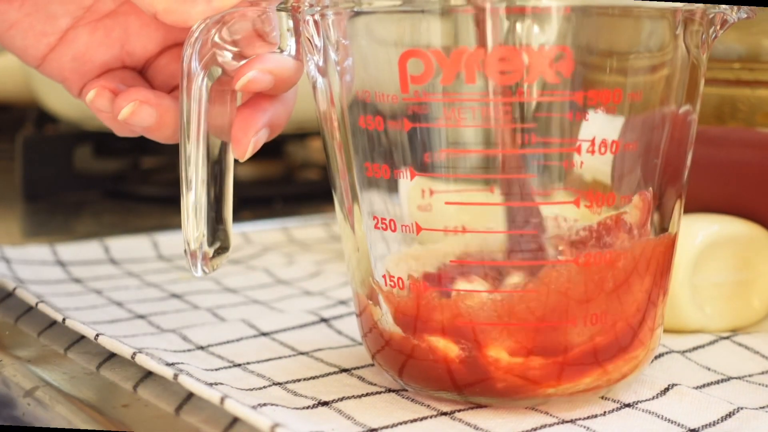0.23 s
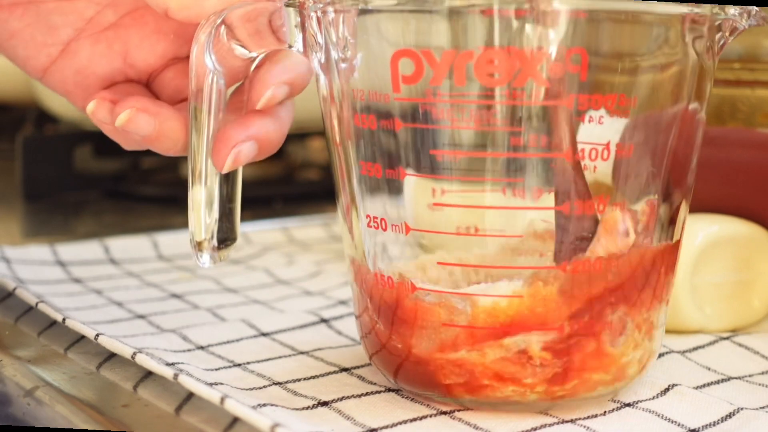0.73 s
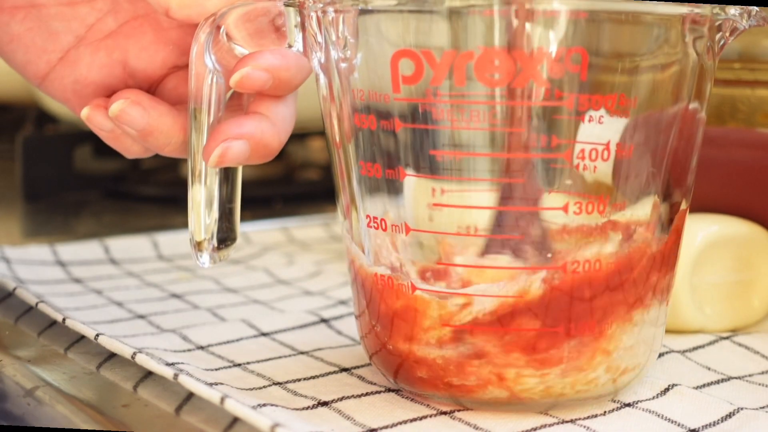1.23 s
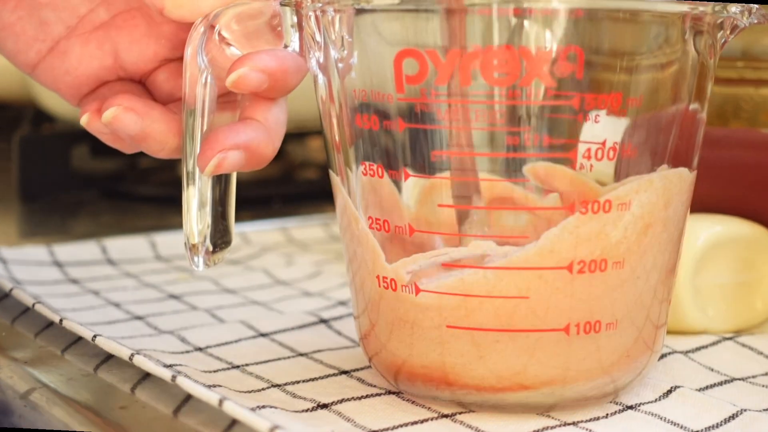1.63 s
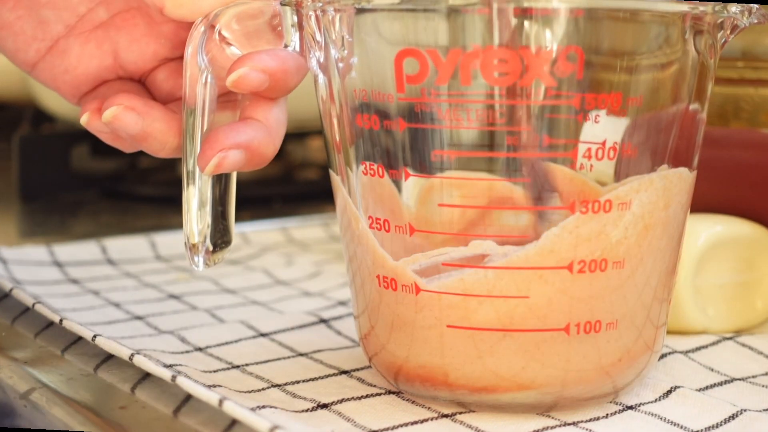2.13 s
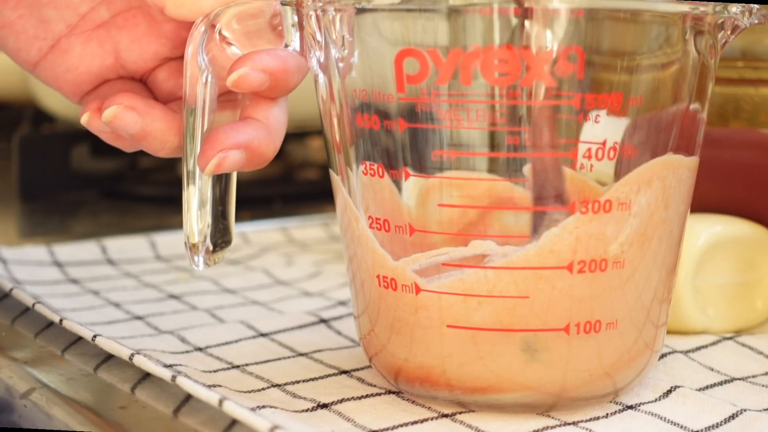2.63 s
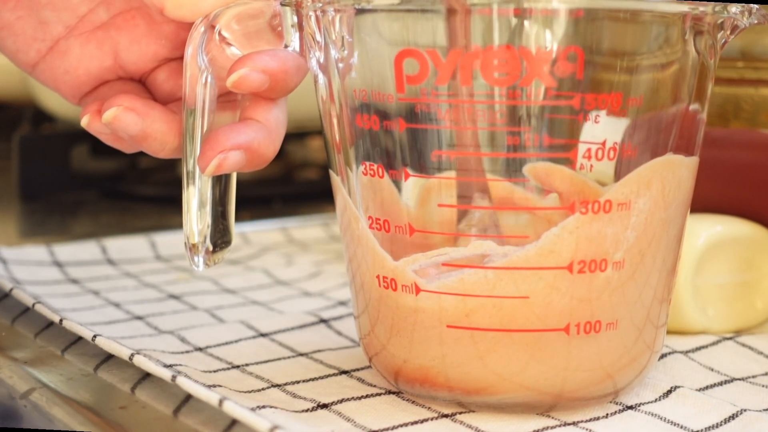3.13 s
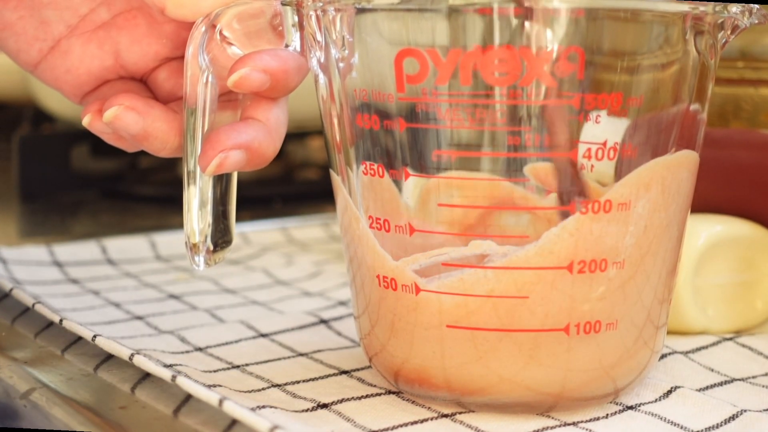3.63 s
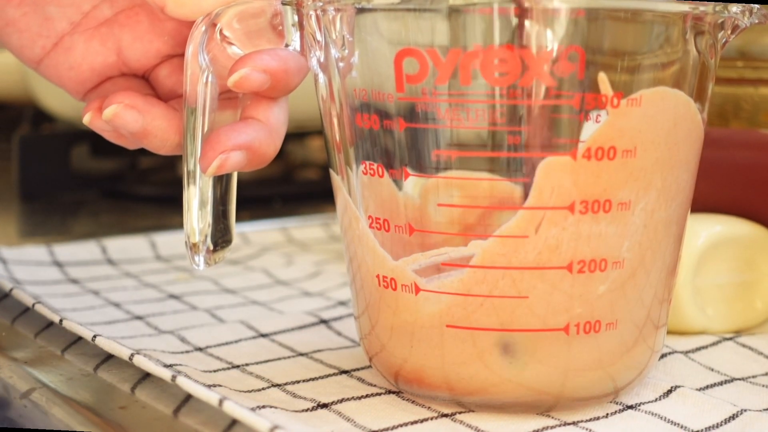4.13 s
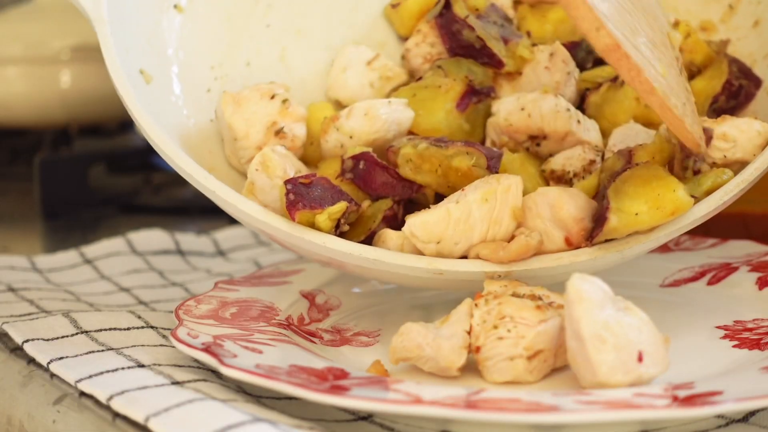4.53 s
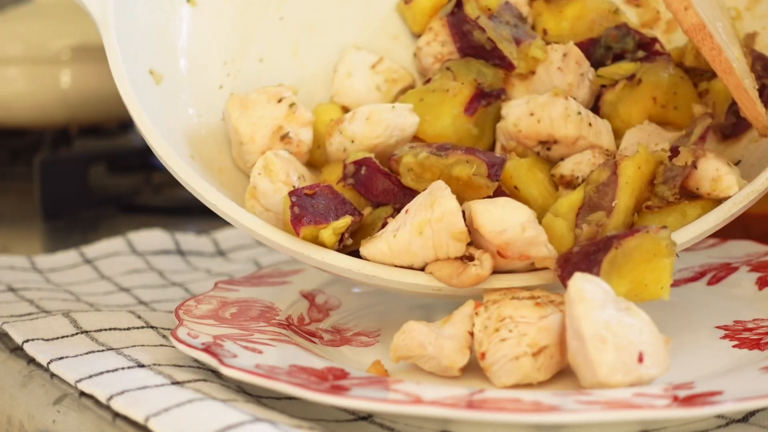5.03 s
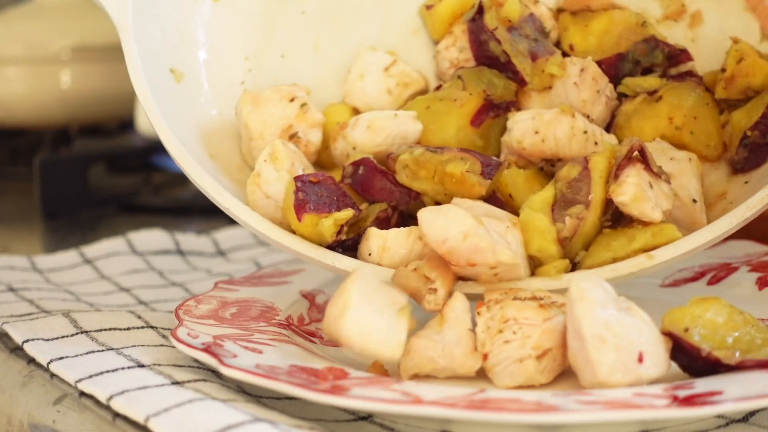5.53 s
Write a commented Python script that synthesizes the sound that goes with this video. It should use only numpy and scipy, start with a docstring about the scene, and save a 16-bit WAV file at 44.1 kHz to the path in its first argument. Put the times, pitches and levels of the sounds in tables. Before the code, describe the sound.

In a small kitchen, close stereo microphones catch a spoon stirring thick sauce in a glass jug: wet smacks, crackling squelch swelling about five times a second, small hollow plops and regular glass clinks. After about four seconds it cuts off with a soft pop; a pan rings, food slips wetly under a spatula, and a double knock hits the plate.

```python
"""In a small kitchen, a spoon stirs thick sauce in a glass jug close to two microphones.
Knocks set decaying tones of glass and air ringing; smacks are bursts of noise with a ringing bubble,
and plops are short sines that rise a little. Shaped random clicks make the squelch, swelling by stroke.
After a few silent milliseconds and a soft pop, food slips from a ringing pan onto a plate, and
the pan knocks on the plate. Echoes and a faint room tone surround it all."""
import sys
import numpy as np
from scipy import signal
from scipy.fft import rfft, irfft
from scipy.io import wavfile

SR = 44100
rng = np.random.default_rng(int(sys.argv[2]) if len(sys.argv) > 2 else 0)


def transcribe(signal):
    """Save signal, clipped to [-1, 1], as a 16-bit WAV file at the path in sys.argv[1]."""
    frames = np.atleast_2d(signal).T
    limited = np.clip(frames, -1, 1)
    pcm = np.round(limited * 32767).astype(np.int16)
    wavfile.write(sys.argv[1], SR, pcm)


N = 254898
TIME = np.arange(N) / SR  # s, whole sound
RING_TIME = np.arange(SR // 3) / SR  # s, since one contact

# In all tables of contacts, strength and other levels are relative; tilt is the treble slope.
# spoon on glass, with a steep tilt where sauce cushions the blow:
# (t/s, strength/dB, low body/dB, tilt/dB per octave, f favoured by the spot struck/Hz, its lift/dB)
KNOCK_EVENTS = [(0.8828, 13, 0, 0, 1950, 21.5), (0.9171, 19, -37, -9.5, 1440, 20),
                (1.1411, 16.5, 5.5, -2, 1470, 14.5), (1.3609, 15, 6.5, -3.5, 1417, 14),
                (1.57, 18, 6.5, -3.5, 1428, 14.5), (1.6993, 21.5, -28, -8.5, 1460, 11),
                (1.918, 17.5, 5.5, -11.5, 1440, 16), (1.9574, 12, 6, 1, 1340, 16),
                (2.135, 19, -0.5, -12, 1482, 15), (2.1767, 17, -7, -3.5, 1330, 11),
                (2.3346, 24, -7, -13, 1410, 8), (2.7654, 21.5, -5.5, -11.5, 1480, 1),
                (2.8074, 15, -13, 1, 3030, 14), (3.009, 17, -4, 0.5, 2373, 11),
                (3.23, 15, -7, 0.5, 2290, 15), (3.4008, 19, 4, -10, 1460, 10),
                (3.453, 15.5, -7, 0.5, 2400, 18), (3.6299, 20.5, 0.5, -11, 1460, 6.5),
                (3.6755, 15, 8, 0.5, 2300, 11), (3.8378, 21.5, -4, -11, 1502, 15.5)]
# sauce tearing from spoon and glass:
# (t/s, strength/dB, low body/dB, tilt/dB per octave, bubble f/Hz, bubble level/dB)
SMACK_EVENTS = [(0.0788, -1, 14, 1, 5150, 3), (0.1455, 2.5, 8.5, 0.5, 2310, 8),
                (0.1903, -0.5, 11.5, -1.5, 5400, 8), (0.2618, 9, -10, 0.5, 8420, 12),
                (0.3896, 2, 14.5, 4, 3350, 14.5), (0.482, 11.5, 0, 0.5, 7640, 4),
                (0.5945, 7, 12, -0.5, 2310, 14), (0.644, -4, -1, 1, 2420, 11),
                (0.7288, -1, 10.5, 1, 4900, 9.5), (0.8301, 4, 13, 2.5, 4540, 11),
                (1.0377, 9, 12.5, 1, 5530, 6.5), (1.063, 0.5, 18.5, 3.5, 7800, 6),
                (1.1804, 7.5, -7, 0.5, 5100, 9), (1.2553, 13.5, 7, -1.5, 2360, 10.5),
                (1.3964, 10.5, -5, -1, 3060, 13.5), (1.4706, 7, 1, 1.5, 8730, 7),
                (1.608, 13.5, 7, -2, 2260, 9), (1.725, 17, 4, -5, 2410, 9),
                (1.8204, 10.5, 0.5, -3.5, 1880, 8), (2.0377, 13, -7, -4, 1920, 12),
                (2.208, 6.5, 9.5, -1, 7330, 10), (2.2507, 9.5, -2, -1.5, 1730, 9.5),
                (2.314, 2.5, -2, 2, 4900, 8.5), (2.422, -4.5, 18.5, 2, 7200, 11),
                (2.5085, 1, 12.5, 0, 5280, 9), (2.5629, 11, 7, -2.5, 4000, -5),
                (2.6111, 3.5, 13.5, 1.5, 2090, 8), (2.68, -0.5, 0, 0, 2260, 8),
                (2.829, 3, 15.5, 1, 3140, -7), (2.8823, 10.5, -7, -2.5, 1750, 12),
                (2.9712, -9, 8, 0.5, 5870, 12), (3.092, 1, 7.5, -0.5, 1760, 13.5),
                (3.209, 7, 4, 1.5, 2880, -7), (3.3096, 6.5, 3, 0.5, 3130, 7.5), (3.388, -3, 0, 2, 2450, -4),
                (3.5198, 2.5, 9, 0.5, 3380, 19.5), (3.7401, 12, -0.5, -4, 2110, 8),
                (3.895, 14, -0.5, -3, 2950, -5), (3.9165, 8, 5.5, -3, 2000, 15),
                (3.948, 6, -7, -2.5, 3330, 13), (4.024, 5.5, 16.5, 0, 5550, 9.5),
                (4.0937, 11, -18, -8, 2250, 10.5), (4.1181, 4.5, 10, 1, 7650, 3),
                (4.168, 8, -14, -1.5, 1650, 13), (4.188, 5.5, 12, -1, 4070, 10)]
# air pockets opening in the sauce: (t/s, level/dB, f/Hz)
PLOP_EVENTS = [(0.071, -28, 855), (0.195, -13, 830), (1.512, -18.5, 832), (1.608, -10.5, 822),
               (1.724, -11, 985), (1.788, -25.5, 855), (2.663, -29, 950), (3.03, -20.5, 840),
               (3.246, -17.5, 797), (3.35, -15.5, 836), (4.164, -28, 800), (4.203, -24, 820)]
# food slipping in the pan: (t/s, strength/dB, tilt/dB per octave, wet tick f/Hz, tick level/dB)
SLIP_EVENTS = [(5.109, -1, -1, 3000, -8), (5.135, -14.5, 0, 3750, 19.5), (5.179, -20, 4, 6060, 16),
               (5.293, -3.5, 3, 4700, -12), (5.351, -7, 0, 1240, 6), (5.412, -17, 5, 1200, 4)]
# blows on the pan: (t/s, strength/dB, tilt/dB per octave, pan ring level/dB, plate ring level/dB)
BLOW_EVENTS = [(4.2329, 7.5, 0, 9.5, 2.5), (5.683, 16, 0, -35, 7.5), (5.709, 17.5, -9, -5, -25)]
# soft pieces landing on the plate: (t/s, level/dB, f/Hz)
THUD_EVENTS = [(5.332, -61, 150), (5.492, -56, 241), (5.599, -63, 137)]
# spatula sliding in the pan: (t/s, level/dB)
SLIDE_COURSE = [(5.28, -91), (5.30, -46), (5.36, -43.5), (5.42, -46.5), (5.48, -75)]
# slow course of the stirring, before the layer gains: (t/s, churn level/dB, crackle level/dB)
STIR_COURSE = [(0.0, -65, -50.5), (0.41, -64, -51), (0.84, -61.5, -46.5), (1.07, -59, -47.5),
               (2.0, -53.5, -45), (2.15, -54, -44.5), (2.43, -53.5, -43.5), (3.07, -61, -50.5),
               (3.4, -52.5, -46), (3.78, -53.5, -43), (4.08, -56, -40.5), (4.21, -58.5, -49)]
# moments when the spoon starts a new stroke: (t/s)
STROKE_STARTS = [0.05, 0.26, 0.469, 0.828, 1.032, 1.238, 1.46, 1.69, 1.909, 2.128, 2.309, 2.551, 2.758,
                 2.998, 3.2, 3.388, 3.619, 3.838, 4.02, 4.3]

# band centres of the contact sounds: (f/Hz)
BAND_HZ = [800, 1550, 3100, 6300, 12000]
# colour of each kind of contact: (relative level/dB, one for each band centre)
KNOCK_BANDS = [1, -0.5, -1, -8, -18]
SMACK_BANDS = [1, -2.5, 1.5, -5.5, -14]
SLIP_BANDS = [-12, -0.5, -1, -4.5, -27]
BLOW_BANDS = [3.5, -2, -4.5, -14, -47]

# ringing tones of the air in the jug, glass, pan and plate: (f/Hz, relative level/dB, 60 dB decay/s)
JUG_AIR_MODES = [(575, -1, .2), (745, 1, .16), (832, 2.5, .11), (943, 2.5, .13), (1066, 2, .18)]
GLASS_MODES = [(1209, 5.5, .24), (1326, 0, .13), (1458, 8, .17), (1770, 3, .16), (1947, 1, .11),
               (2125, 2, .15), (2337, 4, .11), (2552, 1, .14), (2994, 3, .1), (3150, 0, .08),
               (3433, 4, .13), (4630, -3, .06), (4930, -2, .07)]
PAN_MODES = [(425, 16, .34), (575, 17, .27), (1210, 5, .35), (1183, 8, .07), (1336, 10, .13),
             (1930, 13, .23), (2156, 11, .32), (2440, 7, .25), (3047, 5, .3), (3407, 13, .23),
             (3591, 6, .2), (4288, 7, .22), (4900, 11, .27)]
PLATE_MODES = [(535, 10, .12), (578, 18, .4), (643, 13, .25), (681, 15, .4), (918, 5, .3), (955, 6, .3),
               (1067, 7, .3), (1118, 9, .4), (1385, 2, .2), (1512, 4, .2), (2070, 9, .2), (2108, 12, .26),
               (3138, 1, .4), (3429, 5, .28)]

# frequency curves of churn, crackle and room tone: (f/Hz, relative level/dB per Hz)
CHURN_SPECTRUM = [(30, -76), (130, -20.5), (175, -30), (208, -4.5), (245, -12.5), (400, -5), (500, -15),
                  (620, 1.5), (820, 8.5), (1200, 3), (2000, -0.5), (4000, -38)]
CRACKLE_SPECTRUM = [(500, -27), (1200, -2), (2200, 18), (3300, 3.5), (5000, 9.5), (6600, 0), (7700, 4.5),
                    (10500, -3.5), (13000, -11), (16000, -2)]
ROOM_TONE_SPECTRUM = [(24, -90), (40, -39), (133, -35.5), (290, -18.5), (422, -15.5), (455, -10.5),
                      (680, -9), (918, -7.5), (1210, -5), (1440, -8.5), (2770, -11), (6850, -17.5),
                      (7600, -13.5), (8600, -23), (16000, -30.5)]
# how fast the kitchen's tail dies: (f/Hz, 60 dB decay/s)
ROOM_DECAY = [(200, 0.41), (1000, 0.21), (3000, 0.2), (8000, 0.2), (16000, 0.21)]
# echoes from worktop, stove and wall: (delay t/s, relative gain)
NEAR_ECHOES = [(.0022, 0.014), (.0052, 1), (.0066, 0.43), (.0121, 0.98), (.0165, -0.33), (.0238, -0.44),
               (.0285, -0.087)]
# frequency curve of the sliding spatula: (f/Hz, relative level/dB)
SLIDE_SPECTRUM = [(200, -18), (700, -9), (1200, 6), (1700, 2.5), (5000, -5.0), (10000, -14), (16000, -35)]

BREAK_FROM, BREAK_TO = 4.2225, 4.232  # s
ROOM_TONE_DB = -47
EDGE_HZ = 15900  # upper limit of the sound
# each stroke gathers speed, holds it until the second share of its length, then slows into the next
STROKE_RISE, STROKE_HOLD, LULL_DB = 0.28, 0.59, -9
CHURN_DB, CRACKLE_DB, SPITS_DB = 18.5, 6.5, 35.5  # gains of the stirring layers
SPITS_PER_S, SPIT_LOW_HZ, SPIT_HIGH_HZ = 25, 1585, 6930


def knocks():
    """The spoon strikes the wall; glass and air ring, with the tones near one pitch lifted."""
    out = np.zeros((2, N))
    for s, db, body_db, tilt_db, spot_hz, lift_db in KNOCK_EVENTS:
        modes = []
        for hz, mode_db, t60 in GLASS_MODES:
            nearness = np.exp(-(np.log(hz / spot_hz) / 0.037) ** 2)
            modes.append((hz, mode_db + lift_db * nearness, t60))
        glass = amp(-1.5) * ring(modes, spread_db=2)
        air = amp(-4) * ring(JUG_AIR_MODES, spread_db=1.5)
        # the spoon chatters for a few milliseconds, which colours each blow differently
        chatter = contact(direct_db=-9, scatter_db=-7, t60=0.015, width=0.25)
        body = contact(direct_db=-19.5, scatter_db=-4.5, t60=0.19, width=0.26)
        levels = colour(KNOCK_BANDS, db, tilt_db, body_db, knee_hz=2075)
        click = pulse(levels, bass_db=-30.5, lag=0.000597)
        add(out, s, convolve(chatter + body + glass + air, click))
    return out


def smacks():
    """The loud smacks, where the spoon pulls free of the sauce."""
    out = np.zeros((2, N))
    for s, *shape in SMACK_EVENTS:
        add(out, s, smack(*shape))
    return out


def smack(db, body_db, tilt_db, bubble_hz, bubble_db):
    """A film of sauce snaps and frees a bubble; a close reflection follows some 5 ms later; the jug
    colours it."""
    snap = contact(direct_db=-16, scatter_db=-3, t60=0.03, width=0.38)
    early_reflection = contact(direct_db=-17, scatter_db=-5.5, t60=0.035, width=0.36)
    add(snap, 0.0055 * rng.uniform(0.8, 1.2), early_reflection)
    bubble_t60 = 55 / bubble_hz  # the bubble dies by 60 dB in 55 cycles
    bubble = ring([(bubble_hz, bubble_db, bubble_t60)], spread_db=0)
    glass = amp(-9) * ring(GLASS_MODES, spread_db=2)
    air = amp(-7) * ring(JUG_AIR_MODES, spread_db=3)
    levels = colour(SMACK_BANDS, db, tilt_db, body_db)
    return convolve(snap + bubble + glass + air, pulse(levels, bass_db=-26.5, lag=0.00041))


def squelch(churn_follows=0.86):
    """Under the moving spoon the sauce churns, spits and crackles, swelling with each stroke."""
    s, churn_db, crackle_db = np.transpose(STIR_COURSE)
    stroke = stroke_db()
    churn_level = np.interp(TIME, s, churn_db) + churn_follows * stroke
    crackle_level = np.interp(TIME, s, crackle_db) + stroke

    churn = shaped(grains(per_s=600, spread_db=5.5, width=0.12), CHURN_SPECTRUM)
    in_jug = convolve(churn, ring(JUG_AIR_MODES, spread_db=1))
    churn = evened(churn + amp(-6) * in_jug)

    crackle = shaped(bubbles(per_s=1200, spread_db=4.6, cycles=2.5), CRACKLE_SPECTRUM)
    scatter = contact(direct_db=0, scatter_db=0, t60=0.025, width=0.4)
    crackle = evened(convolve(crackle, scatter))

    out = churn * amp(churn_level + CHURN_DB)
    out += crackle * amp(crackle_level + CRACKLE_DB)
    return out + spits(crackle_level)


def stroke_db():
    """Speed of the spoon as a level: it rises, holds and falls in every stroke."""
    phase = np.interp(TIME, STROKE_STARTS, np.arange(len(STROKE_STARTS))) % 1
    rise = phase / STROKE_RISE
    fall = (1 - phase) / (1 - STROKE_HOLD)
    speed = np.clip(np.minimum(rise, fall), 0, 1)
    return LULL_DB * (1 - speed)


def bubbles(per_s, spread_db, cycles, count=20):
    """Tiny bubbles burst at random, each ringing briefly at one of a set of pitches."""
    bursts = grains(per_s, spread_db, width=0.091)
    kind = rng.integers(0, count, N)
    out = np.zeros((2, N))
    for k, hz in enumerate(np.geomspace(1300, 14000, count)):
        r = np.exp(-hz / cycles / SR)  # what is left of the ring after one sample
        resonance = [1, -2 * r * np.cos(2 * np.pi * hz / SR), r * r]
        ringing = signal.lfilter([1, 0, -1], resonance, bursts * (kind == k))
        out += np.sqrt(hz * (1 - r)) * ringing
    return out


def spits(level_db, bubble_db=15, count=12):
    """Small smacks at random moments, each with a bubble at one of a set of pitches."""
    out = np.zeros((2, N))
    kinds = []
    for hz in np.geomspace(SPIT_LOW_HZ, SPIT_HIGH_HZ, count):
        kinds.append(smack(db=SPITS_DB, body_db=12, tilt_db=1.5, bubble_hz=hz, bubble_db=bubble_db))
    chance, size, pitch = rng.random((3, N))
    for i in np.flatnonzero((chance < SPITS_PER_S / SR) & (TIME < BREAK_FROM)):
        size_db = 8 * (size[i] - 1)  # up to 8 dB softer
        add(out, TIME[i], amp(level_db[i] + size_db) * kinds[int(pitch[i] * count)])
    return out


def plops(rise=0.0023, glide=0.0044):
    """Each air pocket rings for a few cycles, rising a little in pitch as it opens."""
    out = np.zeros((2, N))
    for s, db, hz in PLOP_EVENTS:
        age = RING_TIME / rise
        turns = np.cumsum(hz * (1 - glide * np.exp(-age / 2))) / SR
        pocket = amp(db - 0.5) * age * np.exp(1 - age) * np.sin(2 * np.pi * turns)
        jug = amp(-9) * ring(JUG_AIR_MODES, spread_db=1)
        add(out, s, pocket + convolve(pocket, jug))
    return out


def serving():
    """Food slides and slips ahead of the spatula, and the pan rings and sets the plate ringing."""
    out = slide() + slips() + blows()
    return low_cut(out, hz=307)  # thin dishes radiate little bass


def slide():
    """The spatula slides in the pan: many tiny clicks with a shared colour."""
    scrape = shaped(grains(per_s=880, spread_db=2.5, width=0.26), SLIDE_SPECTRUM)
    return scrape * amp(np.interp(TIME, *np.transpose(SLIDE_COURSE), left=-120, right=-120))


def slips():
    """Food slips in the pan: a short scatter of noise and a wet tick at one pitch."""
    out = np.zeros((2, N))
    for s, db, tilt_db, tick_hz, tick_db in SLIP_EVENTS:
        tick = ring([(tick_hz, tick_db, 0.025)], spread_db=0)
        rub = contact(direct_db=-9.0, scatter_db=-4.5, t60=0.054, width=0.23)
        levels = colour(SLIP_BANDS, db, tilt_db)
        add(out, s, convolve(tick + rub, pulse(levels, bass_db=-16)))
    return out


def blows():
    """A blow sets the natural tones of the pan and plate ringing."""
    out = np.zeros((2, N))
    for s, db, tilt_db, pan_db, plate_db in BLOW_EVENTS:
        pan = amp(pan_db) * ring(PAN_MODES, spread_db=0.5)
        plate = amp(plate_db) * ring(PLATE_MODES, spread_db=0.5)
        hit = contact(direct_db=-6, scatter_db=-5, t60=0.17, width=0.22)
        levels = colour(BLOW_BANDS, db, tilt_db)
        add(out, s, convolve(hit + pan + plate, pulse(levels, bass_db=-9.5, lag=0.0003)))
    return out


def thuds(rise=0.003):
    """Soft food lands with a short low push and no ring."""
    out = np.zeros((2, N))
    age = RING_TIME / rise
    for s, db, hz in THUD_EVENTS:
        push = age * np.exp(1 - age) * np.sin(2 * np.pi * hz * RING_TIME)
        add(out, s, amp(db) * push)
    return out


def pop(db=-24, decay=0.00077):
    """A soft low pop, one fast-fading push, ends the break."""
    out = np.zeros((2, N))
    add(out, BREAK_TO, amp(db) * np.exp(-RING_TIME / decay))
    return out


def kitchen(x, echo_db, tail_db):
    """Near surfaces answer first; then a diffuse tail dies band by band."""
    noise = pair(len(RING_TIME), width=0.2)
    hz, t, bands = signal.stft(noise, SR, nperseg=256)
    bands = bands * np.exp(-np.log(1000) * t / read(ROOM_DECAY, hz)[:, None])
    tail = signal.istft(bands, SR, nperseg=256)[1][:, :len(RING_TIME)]
    tail *= 1 - np.exp(-RING_TIME / 0.019)  # builds up gradually
    response = amp(tail_db) * tail / np.linalg.norm(tail[0])
    for delay, gain in NEAR_ECHOES:
        blur = np.exp(-RING_TIME / (0.0025 * delay))  # far, cluttered surfaces return less treble
        add(response, delay, amp(echo_db) * gain * blur / blur.sum())
    response[:, 0] += 1  # the direct sound
    return convolve(x, response)


def room_tone():
    """The steady, faint noise of the room."""
    return amp(ROOM_TONE_DB) * shaped(pair(N, width=0.74), ROOM_TONE_SPECTRUM)


def ring(modes, spread_db):
    """Dying tones; the place of the blow weights each one differently, here at random."""
    hz, db, t60 = np.transpose(modes)[:, :, None]
    rate = np.log(1000) / t60
    height = amp(db + spread_db * rng.standard_normal(hz.shape)) * 2 * rate / SR
    tones = height * np.exp(-rate * RING_TIME) * np.cos(2 * np.pi * hz * RING_TIME)
    return tones.sum(0)


def contact(direct_db, scatter_db, t60, width):
    """A sharp first arrival and a short random scatter behind it."""
    fade = np.exp(-np.log(1000) * RING_TIME / t60)
    onset = 1 - np.exp(-RING_TIME / 0.0015)
    scatter = pair(len(RING_TIME), width) * fade * onset
    out = amp(scatter_db) * scatter / np.linalg.norm(scatter[0])
    out[:, 0] += amp(direct_db)
    return out


def colour(base, db, tilt_db, body_db=0, knee_hz=1550):
    """Band levels of one contact: its kind's colour, tilted above the knee, plus low body."""
    bands = np.array(BAND_HZ)
    octaves = np.maximum(np.log2(bands / knee_hz), 0)
    return np.array(base) + db + tilt_db * octaves + body_db * (bands == bands[0])


def pulse(levels, bass_db, lag=0.0, size=2048):
    """A click with set band levels; its bending waves run faster in the treble (lag/s at 1 kHz)."""
    hz = np.fft.rfftfreq(size, 1 / SR)
    low = levels[0] + bass_db
    points = [(40, low - 18.0), (220, low - 9.5), (450, low), (620, levels[0] - 9.0)]
    points += [*zip(BAND_HZ, levels), (16000, levels[-1] - 12)]
    log_gain = np.log(amp(read(points, abs(np.fft.fftfreq(size, 1 / SR)))))
    # this phase puts no sound ahead of the click
    causal = np.exp(np.conj(signal.hilbert(log_gain)))[:len(hz)]
    dispersion = np.exp(-4j * np.pi * lag * np.sqrt(1000 * hz))
    return irfft(causal * dispersion, size)


def grains(per_s, spread_db, width):
    """Sparse tiny clicks of very uneven size, at random moments."""
    size_db = spread_db * np.minimum(rng.exponential(1, N), 4)
    return pair(N, width) * amp(size_db) * (rng.random(N) < per_s / SR)


def pair(size, width):
    """Noise for two close microphones: a shared part and a part of opposite sign."""
    mid, side = rng.standard_normal((2, size))
    return evened(np.array([mid + width * side, mid - width * side]))


def shaped(x, spectrum):
    """Gives a long signal a frequency curve, at rms (average strength) 1."""
    gain = amp(read(spectrum, np.fft.rfftfreq(N, 1 / SR)))
    return evened(irfft(rfft(x) * gain, N))


def low_cut(x, hz):
    """Gently weakens the bass below hz."""
    return signal.sosfilt(signal.butter(2, hz, "highpass", fs=SR, output="sos"), x)


def convolve(x, response):
    """Passes x through a response, keeping its length."""
    return signal.fftconvolve(np.atleast_2d(x), np.atleast_2d(response), axes=1)[:, :x.shape[-1]]


def add(mix, s, sound):
    """Mixes a sound in at time s, cutting what runs past the end."""
    part = mix[:, round(s * SR):][:, :sound.shape[-1]]
    part += sound[..., :part.shape[-1]]


def read(points, hz):
    """Reads a table between its points, on a log-frequency axis."""
    f, value = np.transpose(points)
    return np.interp(np.log(hz + 1), np.log(f + 1), value)


def evened(x):
    """Scales to rms (average strength) 1."""
    return x / np.sqrt(np.mean(x ** 2) + 1e-20)


def amp(db):
    """Turns decibels into a gain."""
    return 10 ** (np.asarray(db) / 20)


def scene():
    """Stirring, a few milliseconds of silence, then serving; both a little right of centre."""
    in_jug = low_cut(knocks() + smacks() + plops(), hz=150) + squelch()
    stirring = kitchen(in_jug, echo_db=-10.5, tail_db=-8.0)
    stirring *= np.clip((BREAK_FROM - TIME) / 0.0013, 0, 1)  # fades out just before the break
    dishing = kitchen(serving() + thuds(), echo_db=-23.5, tail_db=-4.5)
    heard = (TIME < BREAK_FROM) | (TIME > BREAK_TO)
    placed = stirring * amp([[-0.8], [0.8]]) + dishing * amp([[-0.6], [0.6]])  # left, right/dB
    return heard * (placed + room_tone() + pop())


def record(dry):
    """The loudest peaks are rounded off; then the highest treble is cut away."""
    ceiling, knee = 0.68, 6  # a higher knee gives a sharper bend
    rounded = dry / (1 + abs(dry / ceiling) ** knee) ** (1 / knee)
    treble_cut = signal.firwin(511, EDGE_HZ, window=("kaiser", 9), fs=SR)
    return signal.oaconvolve(rounded, treble_cut[None], "same")


dry = scene()
out = record(dry)
transcribe(out)
```